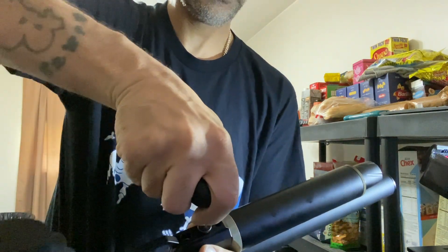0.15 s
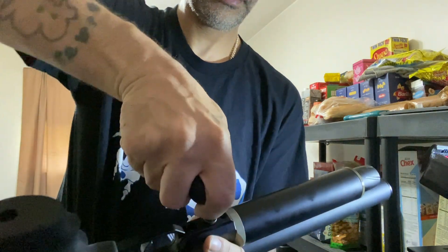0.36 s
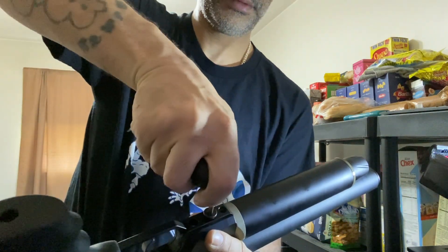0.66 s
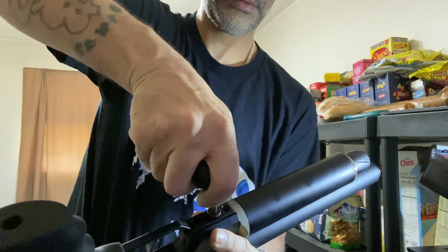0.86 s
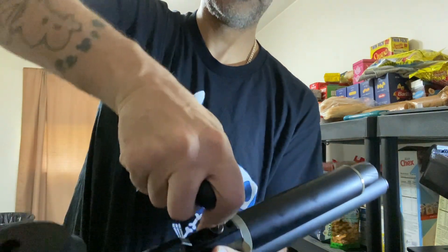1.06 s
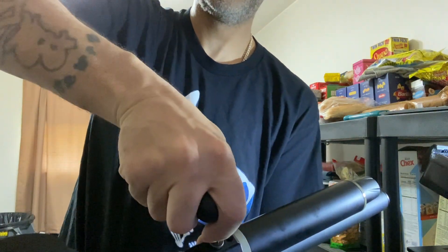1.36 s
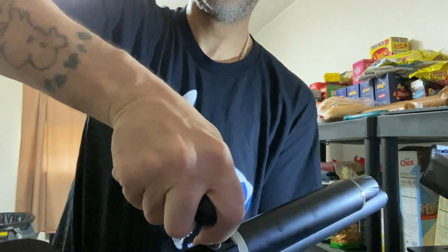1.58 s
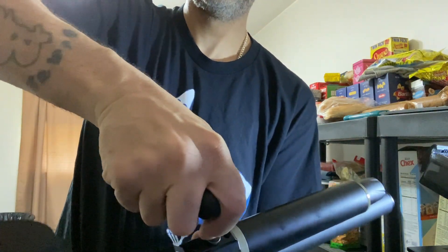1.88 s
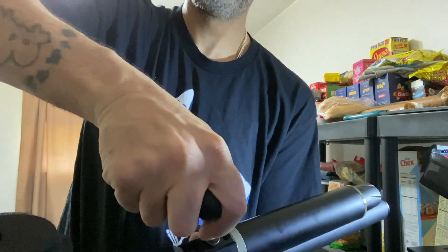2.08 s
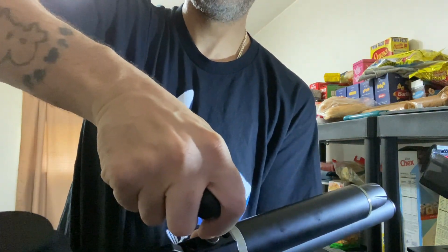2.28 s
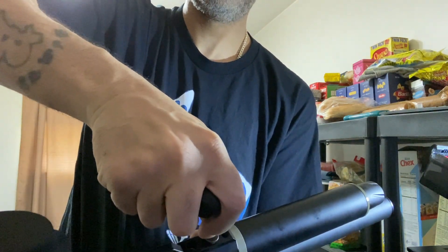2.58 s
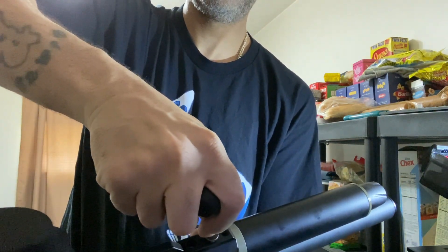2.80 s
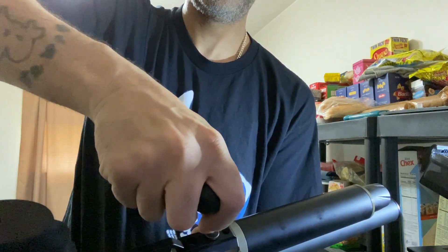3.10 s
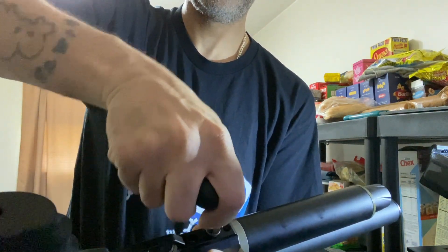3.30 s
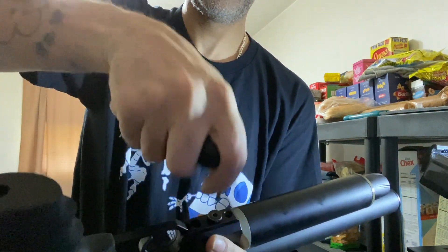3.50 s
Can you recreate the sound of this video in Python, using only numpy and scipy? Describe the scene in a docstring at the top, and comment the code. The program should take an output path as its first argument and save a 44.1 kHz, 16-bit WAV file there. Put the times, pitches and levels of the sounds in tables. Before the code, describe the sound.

Compressed air bursts from an air rifle's tank in a loud, steady bright hiss, after a hand tool ticks and clacks on a metal screw; close microphone in a small kitchen with faint hum.

```python
"""Air rushes from an air rifle's tank in a loud, steady hiss, close to the microphone in a kitchen.
The hiss is noise shaped by the jet and by resonances around the valve, with a low rush building up below.
Before it a hand tool ticks and clacks in the bleed screw: blows and scrapes ring modes of the metal.
The seal spits as it loosens, the rifle thumps and rubs in the hand, and an appliance hums in the room.
The recorder's gain control pushes everything down once the air flows; both channels are the same."""
import sys
import numpy as np
from scipy import signal
from scipy.fft import rfft, irfft
from scipy.io import wavfile
from scipy.ndimage import uniform_filter1d

SR = 44100
rng = np.random.default_rng(int(sys.argv[2]) if len(sys.argv) > 2 else 0)


def dump(signal):
    """Clip the signal to [-1, 1] and save it as 16-bit WAV at the path in sys.argv[1]."""
    limited = np.clip(np.atleast_2d(signal).T, -1, 1)
    pcm = np.round(limited * 32767).astype(np.int16)
    wavfile.write(sys.argv[1], SR, pcm)


N = 160965  # length in samples

# time the kitchen's echoes take to fall by 60 dB (f/Hz, t60/s)
ROOM_DECAY = [(100, 0.66), (500, 0.23), (2000, 0.27), (7000, 0.31), (14000, 0.24)]
ROOM_DELAY_S = 0.005  # the reflections start this long after the direct sound


def amp(db):
    """Decibels to gain."""
    return 10 ** (np.asarray(db) / 20)


def unit(x):
    """Scales to rms 1."""
    return x / np.sqrt(np.mean(x ** 2) + 1e-20)


def read(points, hz):
    """Reads a table of values over frequency on a log-frequency axis."""
    f, value = np.transpose(points)
    return np.interp(np.log(hz + 1), np.log(f + 1), value)


def add(mix, s, sound):
    """Mixes a sound in at time s."""
    part = mix[round(s * SR):][:len(sound)]
    part += sound[:len(part)]


def colour(x, db_at, size=2048):
    """Causal minimum-phase filter whose gain in dB is db_at(Hz)."""
    log_gain = np.log(amp(db_at(abs(np.fft.fftfreq(size, 1 / SR)))))
    taps = np.fft.ifft(np.exp(np.conj(signal.hilbert(log_gain)))).real
    return signal.fftconvolve(x, taps)[:len(x)]


def noise(points):
    """Steady noise of a given spectrum, rms 1."""
    gain = amp(read(points, np.fft.rfftfreq(N, 1 / SR)))
    return unit(irfft(rfft(rng.standard_normal(N)) * gain, N))


def drift(hz):
    """Slow random motion up to a rate, rms 1."""
    f = np.fft.rfftfreq(N, 1 / SR)
    lowpass = (f > 0) / (1 + (f / hz) ** 2)
    return unit(irfft(rfft(rng.standard_normal(N)) * lowpass, N))


def background():
    """Wavering hum lines of an appliance over quiet, broad room noise."""
    # lines of the hum (f/Hz, level/dB)
    hum_lines = [(59.2, -48.5), (119, -53), (165, -46.5), (177.6, -40.5), (242.2, -58), (539.5, -63)]
    # spectrum of the room noise (f/Hz, level/dB per Hz)
    room_air = [(35, -11), (60, 2.5), (200, -3), (300, -8), (550, -15.5), (1200, -24.5), (2800, -24.5),
                (3700, -35), (5700, -28.5), (9000, -35.5), (13000, -42.5), (16000, -68)]
    waver, waver_hz = 0.11, 8.9  # rms share of the strength and rms radians of the phase, then the wavering's rate/Hz
    air_db = -47.5
    t = np.arange(N) / SR
    hum = np.zeros(N)
    for hz, db in hum_lines:
        strength = amp(db) * np.sqrt(2) * (1 + waver * drift(waver_hz))
        phase = 2 * np.pi * (hz * t + rng.random()) + waver * drift(waver_hz)
        hum += strength * np.sin(phase)
    return hum + amp(air_db) * noise(room_air)


def handling():
    """Dull thumps of low noise as the rifle jolts in the hand."""
    # jolts of the rifle (t/s, level/dB, length/s)
    jolts = [(.58, -37, 0.059), (1.093, -35.5, .13), (1.576, -34, 0.039)]
    # spectrum of a thump (f/Hz, level/dB per Hz)
    thump_spectrum = [(25, -41), (42, -17), (60, 2), (110, -14), (200, -17.5), (400, -29), (2000, -78)]
    attack_s = 0.0032
    t, out = np.arange(N) / SR, np.zeros(N)
    for s, db, length in jolts:
        envelope = np.exp(-(t / length) ** 2) * (1 - np.exp(-t / attack_s))
        add(out, s, amp(db) * noise(thump_spectrum) * envelope)
    return out


def scuffs():
    """Fingers and tool rub softly on the rifle: swells of noise with a grainy level."""
    # rubbing strokes (time of the middle t/s, level/dB, length/s)
    rubs = [(0, -51.5, 0.049), (0.447, -58, 0.028), (0.67, -56.5, 0.2), (0.798, -63, 0.032),
            (1.205, -52.5, 0.17), (1.76, -47.5, 0.066)]
    # spectrum of the rubbing (f/Hz, level/dB per Hz)
    rub_spectrum = [(150, -46), (700, 7), (1200, -3.5), (2700, 3), (3800, -0.5), (5500, -4.5), (9000, -11),
                    (15000, -18)]
    grain_db, grain_hz = 2, 120
    t = np.arange(N) / SR
    strokes = sum(amp(db) * np.exp(-((t - s) / length) ** 2) for s, db, length in rubs)
    grainy = noise(rub_spectrum) * amp(grain_db * drift(grain_hz))
    return strokes * unit(grainy)


def knocks():
    """Low, quickly damped modes of the stock sound hollow under the hardest slips."""
    # knocks of the stock (t/s, level at the start/dB, f/Hz)
    stock_knocks = [(1.074, -27, 282), (1.077, -27, 517), (1.5632, -17, 645), (1.7915, -20.5, 680)]
    t60_s = 0.019
    t, out = np.arange(SR // 8) / SR, np.zeros(N)
    for s, db, hz in stock_knocks:
        add(out, s, amp(db - 60 * t / t60_s) * np.sin(2 * np.pi * hz * t))
    return out


def tool():
    """Each slip is a sharp blow with a gritty scrape; it spreads along the metal, treble first, and rings it."""
    # tool against screw and rifle (t/s, level/dB, favoured f/Hz, fall away from it/dB per octave, scrape/s)
    slips = [(0.647, -44, 3900, -3, 0.0022), (0.775, -43, 2390, 15, .001), (0.876, -49, 1850, 15, 0.0027),
             (0.943, -53, 4600, 17, 0.0013), (1.0576, -32, 9000, 31, .001), (1.0618, -28, 5500, 7, .0009),
             (1.0727, -19, 3100, 5, 0.0038), (1.0769, -19.5, 5030, 6, 0.00084),
             (1.0817, -15, 7600, 11, 0.00068), (1.0908, -19, 2500, 12.5, 0.0006),
             (1.109, -25, 2390, 9, 0.00029), (1.363, -40.5, 2070, 21, 0.00031),
             (1.3884, -42, 1880, 13, 0.00052), (1.431, -45, 9000, 1, 0.0045), (1.552, -32, 2800, 8, 0.0063),
             (1.559, -23.5, 3000, 9, 0.00037), (1.5617, -20, 7500, 7, 0.00021),
             (1.572, -36, 9500, 32, 0.0013), (1.694, -35, 1500, 3, 0.0019), (1.771, -34, 2300, 17, .005),
             (1.7794, -20.5, 2120, 16, 0.00056), (1.7917, -17.5, 2550, 12, 0.00056)]
    # modes of rifle and tool (f/Hz, level/dB, t60/s)
    metal_modes = [(717, -3, 0.047), (1490, 5.5, 0.07), (2060, 5.5, 0.044), (2545, 1, 0.043),
                   (3190, 4, 0.026), (4750, -21, 0.03), (5630, 6, 0.019), (7740, 1.5, 0.0083)]
    # dry snap of a contact (f/Hz, level/dB per Hz)
    snap_spectrum = [(60, -5), (300, 1), (1000, -11), (2800, 5), (8500, -5.5), (13000, -15)]
    snap_db = 4  # against the ring
    grit_s = 0.00038  # a scrape this long is as strong as the blow
    bend_s, bend_hz = 0.0028, 983  # travel time of the bending wave at this pitch
    body_share = 0.63  # below this share of the favoured pitch the level falls no further
    size = 4096
    t, f, out = np.arange(size) / SR, np.fft.rfftfreq(size, 1 / SR), np.zeros(N)
    travel = np.exp(-4j * np.pi * bend_s * np.sqrt(bend_hz * f))
    blow = irfft(travel)
    for s, db, pitch_hz, focus_db, length in slips:
        grit = rng.choice([-1., 1.], size) * t / length * np.exp(-t / length)
        push = blow + length / grit_s * grit / np.linalg.norm(grit)
        ring = np.zeros(size)
        for hz, mode_db, t60 in metal_modes:
            mode = amp(-60 * t / t60) * np.sin(2 * np.pi * hz * t)
            ring += amp(mode_db) * unit(signal.fftconvolve(push, mode)[:size])
        snap = colour(push, lambda hz: read(snap_spectrum, hz))
        hit = unit(ring) + amp(snap_db) * unit(snap)
        hit = colour(hit, lambda hz: -focus_db * abs(np.log2(np.maximum(hz / pitch_hz, body_share))))
        # the level is that of the hit's energy spread over 5 ms
        add(out, s, amp(db) * hit / np.linalg.norm(hit) * np.sqrt(SR / 200))
    return out


def spits():
    """First tiny bright puffs of air past the seal as it loosens: noise that dies at once."""
    # puffs (t/s, level/dB)
    puffs = [(1.728, -34.5), (1.734, -36), (1.741, -35)]
    puff_spectrum = [(500, -25), (4000, -2), (10000, 8), (16000, -9)]  # (f/Hz, level/dB per Hz)
    decay_s = 0.0016
    t, out = np.arange(N) / SR, np.zeros(N)
    for s, db in puffs:
        add(out, s, amp(db) * noise(puff_spectrum) * np.exp(-t / decay_s))
    return out


def rush():
    """A low rush of noise builds up under the hiss."""
    # spectrum of the rush (f/Hz, level/dB per Hz)
    rush_spectrum = [(30, -30), (70, -4), (280, -5), (400, 6.5), (600, -4), (1500, -5.5), (3000, -34)]
    # its growth (t/s, level/dB)
    growth = [(1.85, -65), (2.15, -40.5), (2.5, -34.5), (3.65, -29)]
    level_db = np.interp(np.arange(N) / SR, *np.transpose(growth), left=-120)
    return noise(rush_spectrum) * amp(level_db)


def jet():
    """Turbulent air sounds the resonances around the valve, which change as the hand shifts."""
    # air flow through the valve (t/s, level/dB)
    flow = [(1.755, -71), (1.78, -37), (1.801, -23.5), (1.819, -12), (1.85, -2.5), (1.97, 0), (2.6, 0.5),
            (3.25, 2)]
    # broad noise of the jet (f/Hz, level/dB per Hz)
    jet_spectrum = [(100, -30), (400, -28), (800, -26.5), (1500, -16), (2100, -10.5), (2500, -2.5),
                    (3750, -1.5), (4800, -1.5), (5700, -2), (6300, -9.5), (7200, -1.5), (12000, -2.5),
                    (15700, -4)]
    # resonances between valve and hand (f/Hz, width/Hz, level at first/dB, level after the shift/dB)
    cavity = [(2760, 64, 2, 6), (3070, 157, 8, 10.5), (3162, 62, 11, 12), (3490, 52, 2, 2),
              (4130, 86, 1, -1), (5095, 105, 3, 2.5), (7260, 480, -3, -2), (8090, 440, -3, 6.5),
              (8720, 460, 6, -4), (9500, 350, -42, 4), (9960, 300, 3, -19), (11340, 700, -4, -3.5),
              (13200, 2800, -19, -1)]
    # gain of the treble (t/s, level/dB)
    treble = [(1.8, -1.5), (2.05, -2.5), (2.35, -1.5), (2.75, 1), (3.65, 1)]
    treble_hz, treble_blend_hz = 10600, 1000
    shift_s, shift_length_s = 3.33, 0.11  # middle and length of the hand's shift
    swell_db, swell_at_s, swell_s = 5.5, 1.95, 0.088  # the resonances swell soon after the valve opens
    wander_share, wander_hz = 0.0022, 6.7  # and wander a little in pitch
    flutter_db, flutter_hz, patchy_db = 0.5, 60, 1.35

    seconds = np.arange(N) / SR
    hz, t, z = signal.stft(rng.standard_normal(N), SR, nperseg=1024, noverlap=768)
    hz = hz[:, None]
    shifted = (1 + np.tanh((t - shift_s) / shift_length_s)) / 2
    swell = swell_db * np.exp(-((t - swell_at_s) / swell_s) ** 2)
    power = amp(read(jet_spectrum, hz)) ** 2
    for centre, width, first_db, last_db in cavity:
        centre = centre * (1 + wander_share * np.interp(t, seconds, drift(wander_hz)))
        peak_db = swell + first_db + (last_db - first_db) * shifted
        power = power + amp(peak_db) ** 2 / (1 + ((hz - centre) / width) ** 2 * 2) ** 2

    treble_share = (1 + np.tanh((hz - treble_hz) / treble_blend_hz)) / 2
    treble_db = np.interp(t, *np.transpose(treble)) * treble_share
    # random patches of level across pitch and time
    patches = uniform_filter1d(rng.standard_normal(z.shape), size=12, axis=0)
    patches = unit(uniform_filter1d(patches, size=10, axis=1))
    shaped = z * np.sqrt(power) * amp(treble_db + patchy_db * patches)
    air = signal.istft(shaped, SR, nperseg=1024, noverlap=768)[1][:N]
    flow_db = np.interp(seconds, *np.transpose(flow), left=-120)
    return unit(air) * amp(flow_db + flutter_db * drift(flutter_hz))


def nearby(x):
    """Reflections from hand and tank cancel a few bands."""
    # weakened bands (f/Hz, width/Hz, level/dB)
    notches = [(3760, 66, -5), (7800, 190, -6), (10410, 144, -3.5)]
    return colour(x, lambda f: sum(db * np.exp(-((f - hz) / width) ** 2) for hz, width, db in notches))


def kitchen(x, wet_db):
    """Adds a dense tail of reflections, each band dying at its own speed."""
    hz, t, z = signal.stft(rng.standard_normal(SR // 2), SR, nperseg=256)
    decay = amp(-60 * t / read(ROOM_DECAY, hz)[:, None])
    tail = signal.istft(z * decay, SR, nperseg=256)[1]
    out = x.copy()
    add(out, ROOM_DELAY_S, amp(wet_db) * signal.fftconvolve(x, tail / np.linalg.norm(tail)))
    return out


def scattered(x, wet_db):
    """The cluttered room scatters each click into a smooth puff of noise that dies away."""
    hz, t, z = signal.stft(x, SR, nperseg=128, noverlap=96)
    power = uniform_filter1d(abs(z) ** 2, size=3, axis=0)
    keep = amp(-60 * t[1] / read(ROOM_DECAY, hz)) ** 2  # share of the power left after one frame
    decay = np.array([signal.lfilter([1 - r], [1, -r], band) for r, band in zip(keep, power)])
    grain = signal.stft(rng.standard_normal(N), SR, nperseg=128, noverlap=96)[2]
    puff = grain / np.std(grain) * np.sqrt(abs(decay))
    tail = signal.istft(puff, SR, nperseg=128, noverlap=96)[1]
    out = x.copy()
    add(out, ROOM_DELAY_S, amp(wet_db) * tail)
    return out


def scene():
    """All sources in the kitchen, the same in both channels."""
    air = nearby(jet() + rush()) + spits()
    clacks = tool() + knocks()
    in_room = scattered(clacks, wet_db=-11.5) + kitchen(air, wet_db=-9)
    mono = in_room + scuffs() + handling() + background()
    return np.array([mono, mono])


def record(dry, threshold_db=-17, squeeze=0.63, follow_s=0.027):
    """Gain control holds the hiss down, rumble is cut, the highest peaks are rounded off; then the band limit."""
    low_cut_hz, peak_limit, cutoff_hz = 42, 0.85, 15780
    r = np.exp(-1 / (follow_s * SR))
    level_db = 10 * np.log10(signal.lfilter([1 - r], [1, -r], dry[0] ** 2) + 1e-12)
    # squeeze is the dB taken off for each dB above the threshold
    held = dry * amp(-squeeze * np.maximum(level_db - threshold_db, 0))
    held = signal.sosfilt(signal.butter(4, low_cut_hz, "highpass", fs=SR, output="sos"), held)
    held = held / (1 + (held / peak_limit) ** 6) ** (1 / 6)
    band_limit = signal.firwin(511, cutoff_hz, window=("kaiser", 9), fs=SR)
    return signal.oaconvolve(held, band_limit[None], "same")


dry = scene()
out = record(dry)
dump(out)
```